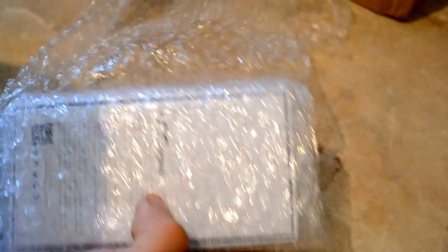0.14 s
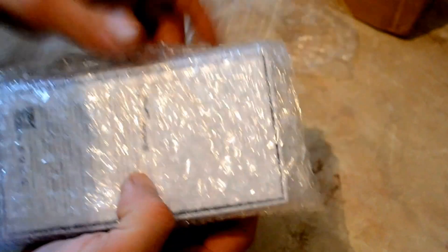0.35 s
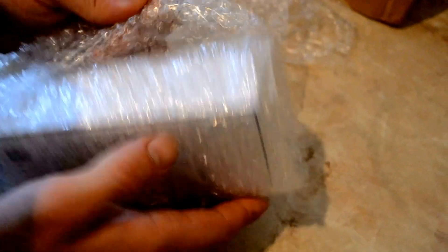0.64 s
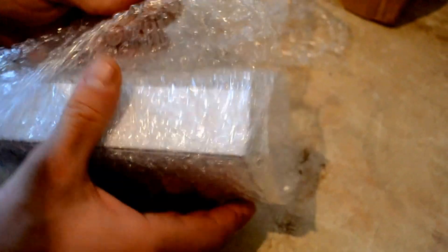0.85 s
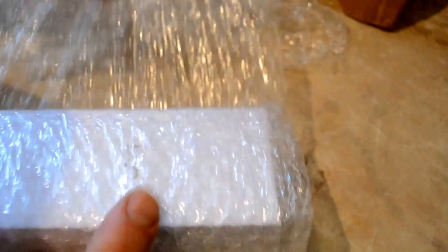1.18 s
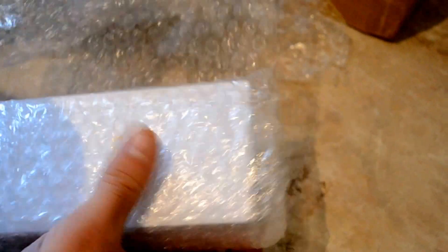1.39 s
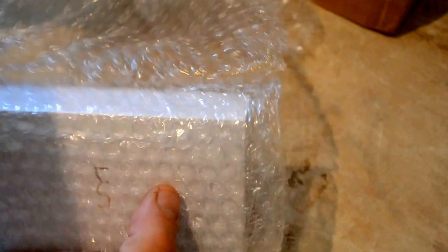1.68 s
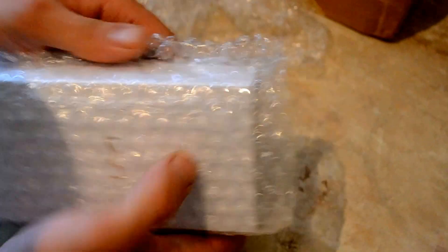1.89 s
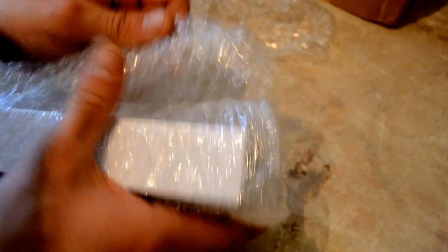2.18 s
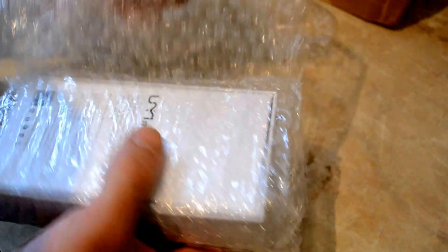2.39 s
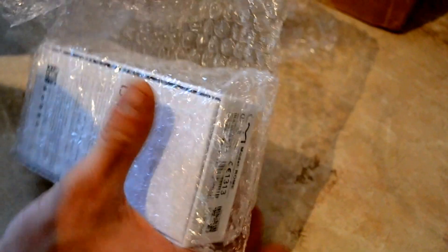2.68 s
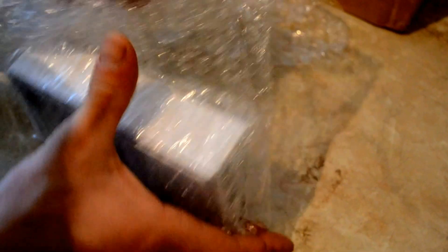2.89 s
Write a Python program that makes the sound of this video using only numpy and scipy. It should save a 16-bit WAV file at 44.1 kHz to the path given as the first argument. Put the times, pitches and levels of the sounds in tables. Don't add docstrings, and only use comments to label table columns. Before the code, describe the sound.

Bubble wrap crinkles and snaps sharply as hands pull it off a small box, close up

```python
import sys
import numpy as np
from scipy import signal
from scipy.fft import rfft, irfft
from scipy.io import wavfile

SR = 44100
rng = np.random.default_rng(int(sys.argv[2]) if len(sys.argv) > 2 else 0)


def level_to_linear(level):
    exponent = np.asarray(level, float) / 20
    return 10 ** exponent


def master(y):
    cut = np.clip(np.atleast_2d(y).T, -1, 1)
    pcm = np.round(cut * 32767)
    wavfile.write(sys.argv[1], SR, pcm.astype(np.int16))


N = 134505

# (time [s], rustle level [dB], dullness of the folds [dB])
PULL = [(0, -39.5, -1), (.1, -47.5, 1), (.25, -50, 9), (.43, -35.5, -1), (.47, -31.5, -2.5),
        (.56, -28, 0.5), (.72, -31.5, 1.5), (.76, -40.5, 11.5), (.87, -32, -1), (1.0, -29, -1),
        (1.1, -31, 0.5), (1.3, -38, -2.5), (1.848, -39.5, -2), (1.93, -28, -4.5), (2.07, -32.5, 5.5),
        (2.5, -29.5, -1), (2.74, -42, -1.5), (3.05, -34.5, -4)]
# (middle [s], half width [s], level over the rustle [dB], added dullness [dB])
GUSTS = [(.01, 0.049, 9, -1), (.275, 0.0181, -10, 15), (0.465, 0.0056, 9, 0.5), (0.487, 0.01316, 14, -5.5),
         (0.517, 0.0203, 3, 5), (0.631, 0.0069, 11, -6), (0.68, 0.0219, 5.5, 3.5),
         (0.792, 0.0083, 11.5, -13.5), (0.924, 0.0386, 8.5, -6.5), (.958, 0.0096, 6, -1.5),
         (0.994, 0.0266, 7.5, -5.5), (1.031, 0.035, 5, 0.5), (1.165, 0.0305, 4.5, 0),
         (1.21, 0.0494, -1, 6.5), (1.373, 0.0475, 5, 3.5), (1.507, 0.0075, 14, -6.5),
         (1.547, 0.0304, 10, -1.5), (1.46, 0.0405, 2.5, -3), (1.66, 0.0214, -1.5, -10),
         (1.71, 0.0075, -0.5, 5.5), (1.967, 0.028, 10, -6.5), (2.003, 0.0344, 2.5, 6.5),
         (2.111, 0.0143, 3.5, 2.5), (2.265, 0.0703, 5.5, -4.5), (2.405, 0.026, -0.5, 1.5),
         (2.562, 0.024, -1, 4), (2.661, 0.0148, 4.5, 5), (2.814, 0.0079, 11.5, -7),
         (2.833, 0.0089, 18.5, -13), (2.87, 0.038, 8, -3.5)]
# (frequency [Hz], density [dB per Hz])
DULL_FOLDS = [(200, -30.5), (420, -15), (750, -11), (1450, -1), (2300, -2), (3100, 0), (4200, -4.5),
              (9000, -20.5)]
# (frequency [Hz], density [dB per Hz])
BRIGHT_BUCKLES = [(1000, -38), (3000, -14), (4500, -10.5), (6000, -6), (7000, -1), (7600, -7.5),
                  (8100, -13.5), (11500, -38.5)]
# (time [s], peak [dB], share of dull colour [dB], pocket pitch [Hz])
EARLY_SNAPS = [(0.107, -26.5, -4.5, 1250), (0.136, -21.5, 6.5, 1490), (0.156, -25, 5.5, 1210),
               (0.172, -21, 3, 1550), (0.228, -17.5, -24, 3430), (0.267, -12, 3.5, 2840),
               (0.276, -11.5, 14, 2810), (0.341, -19.5, -26.5, 3440), (0.369, -30, -36, 3260),
               (0.397, -22, -26, 3160), (0.445, -1, -24.5, 2890), (0.481, -9, -6, 2990),
               (0.486, -7.5, -26, 1826), (0.495, -13, -11, 3320), (0.508, -2.5, -5.5, 2970),
               (0.515, -4, 3.5, 3436), (0.589, -13, -31, 2140), (0.601, -9.5, -17.5, 1910),
               (0.605, -2.5, -25.5, 2980), (0.618, -13, -14.5, 2000), (0.629, -1.5, -15, 3280),
               (0.642, -21.5, -10, 2820), (0.659, -8, -15, 1680), (0.668, -11, -7, 3220),
               (0.675, -11.5, -1.5, 1596), (0.682, -11, -11.5, 3050), (0.699, -6.5, -6.5, 1730),
               (0.703, -6, 3, 2920), (0.722, -5.5, 0.5, 1710), (0.796, -6, -9, 1690),
               (0.818, -11.5, -11, 1645), (0.835, -8.5, -4, 1780), (0.861, -19.5, -9.5, 2100),
               (0.894, -7.5, -13, 1790)]
MIDDLE_SNAPS = [(0.912, -12.5, -18, 1830), (0.921, -6, -22.5, 3240), (0.941, -11, -23.5, 2690),
                (0.95, -15.5, -18, 3000), (0.96, -2, -25, 2480), (0.982, -11, -18.5, 1297),
                (0.988, -3.5, -30, 3050), (0.996, -14, -19.5, 1830), (1.0, -10.5, -21, 2170),
                (1.016, -12, -5.5, 2160), (1.037, -7, -11.5, 1560), (1.127, -13.5, -10.5, 3560),
                (1.132, -3.5, -19, 1860), (1.147, -5, -8.5, 2266), (1.164, -9.5, -21, 2150),
                (1.18, -3, -12.5, 2266), (1.193, -13.5, -12, 2110), (1.214, -9.5, -16, 2100),
                (1.232, -8, -27, 3440), (1.247, -14.5, -19, 2110), (1.29, -14, -22.5, 2140),
                (1.364, -18, -3.5, 2170), (1.494, -24, -10, 3580), (1.507, -24, -28.5, 2910),
                (1.542, -27.5, -17.5, 3460)]
LATE_SNAPS = [(1.869, -16, -29.5, 2300), (1.917, -12.5, -27.5, 3430), (1.946, -17, -12.5, 2900),
              (1.965, -8, -23.5, 1750), (1.97, -14, -20.5, 1790), (2.001, -0.5, -14, 2285),
              (2.009, -9, 2.5, 1724), (2.034, -13, -9.5, 1250), (2.105, -9.5, -5.5, 1616),
              (2.114, -4, -9.5, 3210), (2.117, -3.5, -17.5, 3110), (2.124, -9, -12, 3300),
              (2.14, -12.5, -6.5, 3020), (2.149, -9, -8, 3080), (2.165, -14, -4, 1740),
              (2.174, -14, -10.5, 1520), (2.189, -21.5, -17, 1900), (2.216, -15, -12, 1666),
              (2.235, -7.5, -10, 3060), (2.255, -9.5, -17.5, 2920), (2.264, -10.5, -16, 1730),
              (2.284, -12, -9.5, 1214), (2.403, -11.5, -25, 2290), (2.449, -13, -8, 1223),
              (2.503, -7.5, -19, 1480), (2.763, -17.5, -21, 3324), (2.898, -19.5, -13.5, 3430),
              (2.938, -15, -19.5, 3670)]
# (time [s], peak [dB], pitch [Hz])
BOX_TAPS = [(.269, -32.5, 1150), (0.278, -25, 1086), (.706, -23, 465), (.797, -34, 437),
            (1.015, -27.5, 654), (1.157, -25.5, 550), (1.35, -35.5, 490), (1.703, -35.5, 534),
            (1.709, -30, 1260), (1.717, -39, 415), (1.738, -39, 550), (1.97, -25, 1100), (2.003, -19, 1104),
            (2.099, -29, 625), (2.263, -28.5, 644), (2.502, -25, 683), (2.587, -20.5, 1100),
            (2.68, -26.5, 1195), (2.748, -35.5, 338)]
# (time [s], peak [dB], board ring [dB])
KNOCKS = [
    (0.702, -32, -53),
    (1.343, -40, -14),
    (2.093, -20, -6),
    (2.583, -12.5, -13.5),
    (2.686, -24.5, -19),
]
# (frequency [Hz], level [dB], t60 [s])
BOX_MODES = [(270, -20, .06), (320, -17, .08), (355, -16, .12), (405, -16, .07), (460, -16, .05),
             (530, -16, .04), (790, -19, .025), (1150, -15, .02), (1900, -16, .012)]
# (time [s], length [s], start pitch [Hz], end pitch [Hz], level [dB])
SQUEAKS = [
    (2.807, 0.0058, 3820, 3738, -21),
    (2.812, 0.0122, 3565, 5120, -33.5),
    (2.8271, 0.00288, 3170, 3442, -15),
    (2.829, 0.00563, 3505, 3476, -13.5),
    (2.837, 0.0236, 3512, 3577, -30),
    (2.862, 0.025, 3380, 3427, -33.5),
    (2.885, 0.0261, 3480, 3450, -31),
    (2.913, 0.0356, 3500, 3478, -31.5),
]
# (first [dB], second [dB], third [dB])
SQUEAK_PARTIALS = [
    [-7, 0, -28],
]
# (frequency [Hz], density [dB per Hz])
HUSH = [(15, -72), (25, -29.5), (293, -12), (819, -10), (1230, -7), (5470, -9), (6710, -3), (7440, -12),
        (11500, -41.5), (15000, -71), (22000, -120)]
# (time [s], full-band tick [dB], low thump [dB])
OVERLOADS = [
    (0.4476, -12.5, -3),
    (0.6066, -20.5, -5),
    (0.6283, -20.5, -13.5),
    (2.0019, -23, -13),
    (2.1199, -17.5, -0.5),
]


def at_hz(points, hz):
    p = np.array(points, float)
    return np.interp(np.log(np.maximum(hz, 1)), np.log(p[:, 0]), p[:, 1])


def colour_response(spectrum):
    size = 2 ** 13
    hz = np.arange(size // 2 + 1) * SR / size
    cepstrum = irfft(np.log(level_to_linear(at_hz(spectrum, hz))), size)
    cepstrum[1:size // 2] *= 2
    cepstrum[size // 2 + 1:] = 0
    response = irfft(np.exp(rfft(cepstrum)), size)[:size // 2]
    return response / np.linalg.norm(response)


def colour(x, spectrum):
    return signal.fftconvolve(x, colour_response(spectrum))[:N]


def highpass(x, order, hz):
    return signal.sosfilt(signal.butter(order, hz, "high", fs=SR, output="sos"), x)


def rms_one(x):
    return x / np.sqrt(np.mean(x ** 2) + 1e-20)


def drift(rate_hz):
    r = np.exp(-2 * np.pi * rate_hz / SR)
    noise = rng.standard_normal(N + SR)
    return rms_one(signal.lfilter([1], [1, -2 * r, r * r], noise)[SR:])


def die(clicks, s):
    return signal.lfilter([1], [1, -np.exp(-1 / (s * SR))], clicks + 1e-18)


def ring(clicks, hz, t60):
    r = level_to_linear(-60 / (t60 * SR))
    w = 2 * np.pi * hz / SR
    return signal.lfilter([0, np.sin(w)], [1, -2 * r * np.cos(w), r * r], clicks + 1e-18)


def spikes(s, db):
    out = np.zeros(N)
    np.add.at(out, (np.asarray(s) * SR).astype(int), level_to_linear(np.asarray(db)))
    return out


def grains():
    grains_per_s, spread_db, grain_s = 5000, 3.4, .0004
    sizes = level_to_linear(spread_db * np.minimum(rng.exponential(1, N), 5))
    buckles = sizes * (rng.random(N) < grains_per_s / SR)
    return rms_one(die(buckles, grain_s) * rng.standard_normal(N))


def rustle():
    clump_db, bright_db, fold_db = 1.6, -1.2766, -3.5
    s, level_db, dullness_db = np.transpose(PULL)
    t = np.arange(N) / SR
    effort_db = np.interp(t, s, level_db) + clump_db * drift(70.0)
    dull_db = np.interp(t, s, dullness_db)
    for middle, half, db, more_dull_db in GUSTS:
        bump = np.exp(-np.minimum(((t - middle) / half) ** 2, 50))
        effort_db = effort_db + db * bump
        dull_db = dull_db + more_dull_db * bump
    shared = grains()
    bright = level_to_linear(effort_db + bright_db) * (0.651 * shared + 0.721 * grains())
    fold_level_db = effort_db + fold_db + dull_db + 0.814 * drift(6.67)
    dull = level_to_linear(fold_level_db) * (0.735 * shared + 0.8834 * grains())
    return colour(bright, BRIGHT_BUCKLES) + colour(dull, DULL_FOLDS)


def snaps():
    level_db, dull_boost_db, click = 0.1, 12, 4
    rise_s, crack_s, tail_s, tail_db = .00006, 0.0006, 0.0025, -13
    pocket_t60_s, pocket_db = 0.008, -13
    rows = list(EARLY_SNAPS) + list(MIDDLE_SNAPS) + list(LATE_SNAPS)
    t = np.arange(SR // 25) / SR
    onset = np.exp(-t / rise_s)
    shape = (1 - onset) * (np.exp(-t / crack_s) + level_to_linear(tail_db) * np.exp(-t / tail_s))
    dull, bright = colour_response(DULL_FOLDS), colour_response(BRIGHT_BUCKLES)
    out = np.zeros(N + SR)
    noises = rng.standard_normal((len(rows), len(t)))
    for (s, db, dull_db, hz), noise in zip(rows, noises):
        pocket = ring(signal.unit_impulse(len(dull)), hz, pocket_t60_s)
        body = dull + level_to_linear(pocket_db) * pocket
        push = (noise + click * onset) * shape
        snap = signal.fftconvolve(push, bright + level_to_linear(dull_db + dull_boost_db) * body)
        i = int((s + 0.0010925) * SR)
        out[i:i + len(snap)] += level_to_linear(db + level_db) * snap / abs(snap).max()
    return highpass(out[:N], 2, 700)


def taps_on_box():
    ring_cycles, soft_s = 13, .0006
    out = np.zeros(N)
    for s, db, hz in BOX_TAPS:
        push = die(spikes([s], [db]), soft_s) * 2 * np.pi * hz / SR
        out += ring(push, hz, ring_cycles / hz)
    return highpass(out, 3, 280)


def knocks():
    rattle_s, rattle_db = .03, -25
    board_hz, board_t60_s, board_level_db = 144.9, 0.329, -11.5
    s, db, board_db = np.transpose(KNOCKS)
    luck_db = rng.normal(0, 2, (len(s), len(BOX_MODES)))
    board = ring(spikes(s + .006, db + board_db + board_level_db), board_hz, board_t60_s)
    box = np.zeros(N)
    for k, (hz, level_db, t60) in enumerate(BOX_MODES):
        hit = spikes(s + .003, db + level_db + luck_db[:, k])
        rattle = level_to_linear(rattle_db) * die(hit, rattle_s) * rng.standard_normal(N)
        box += ring(hit + rattle, hz, t60)
    return board + highpass(box, 2, 260)


def squeaks():
    roughness = .7
    out, wobble = np.zeros(N), drift(250)
    waver_hz = 55 * drift(300)
    for s, length, start_hz, end_hz, db in SQUEAKS:
        i, u = int(s * SR), np.linspace(0, 1, int(length * SR))
        span = slice(i, i + len(u))
        pitch_hz = start_hz + (end_hz - start_hz) * np.sqrt(u) + waver_hz[span]
        phase = 2 * np.pi * np.cumsum(pitch_hz) / SR
        tone = sum(level_to_linear(p) * np.sin((k + 1) * phase) for k, p in enumerate(SQUEAK_PARTIALS[0]))
        swell = np.sin(np.pi * u) ** .5
        out[span] += level_to_linear(db) * tone * swell * (1 + roughness * wobble[span])
    return out


def room(x):
    t60_s = .2
    t = np.arange(SR // 2) / SR
    tail = rng.standard_normal(len(t)) * level_to_linear(-60 * t / t60_s) * (t > .004)
    return signal.fftconvolve(x, tail / np.linalg.norm(tail))[:N]


def hush():
    return level_to_linear(-43.5) * colour(rng.standard_normal(N), HUSH)


def scene():
    near = rustle() + snaps() + taps_on_box() + knocks() + squeaks()
    near = highpass(near + level_to_linear(-15) * room(near), 4, 125.)
    return (near + hush())[None]


def low_pass(x):
    return signal.sosfilt(signal.butter(12, 15900, fs=SR, output="sos"), x)


def record(dry):
    ceiling, cutoff_hz, thump_hz = .77, 12600, 300
    rounded = ceiling * np.tanh((abs(dry) / ceiling) ** 3) ** (1 / 3) * np.sign(dry)
    x = signal.sosfilt(signal.cheby2(12, 80, cutoff_hz, fs=SR, output="sos"), rounded)
    s, tick_db, thump_db = np.transpose(OVERLOADS)
    thump = signal.sosfilt(signal.butter(1, thump_hz, fs=SR, output="sos"), spikes(s, thump_db))
    mix = np.clip(x + spikes(s, tick_db) + thump, -ceiling, ceiling)
    return low_pass(mix)


dry = scene()
out = record(dry)
master(out)
```